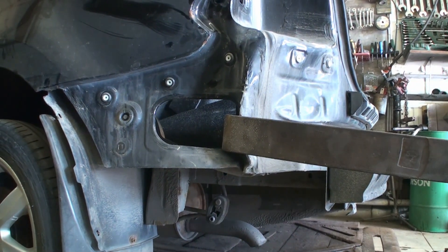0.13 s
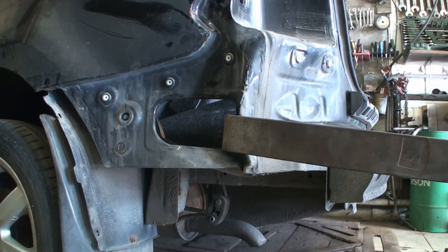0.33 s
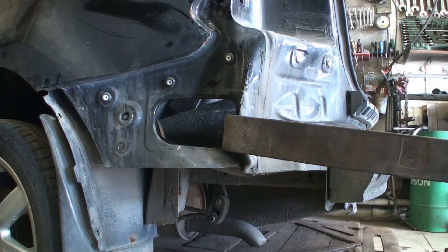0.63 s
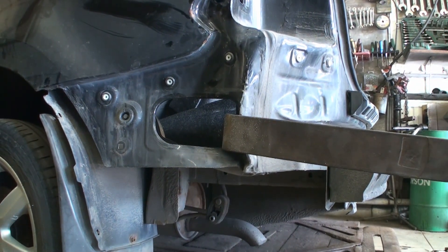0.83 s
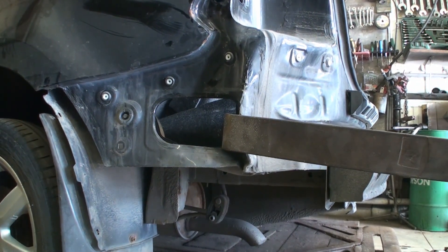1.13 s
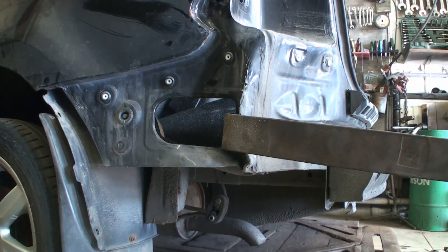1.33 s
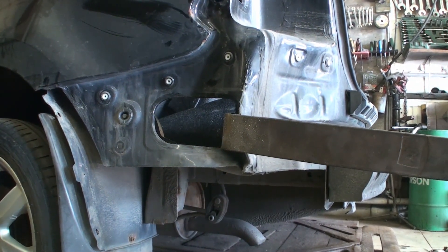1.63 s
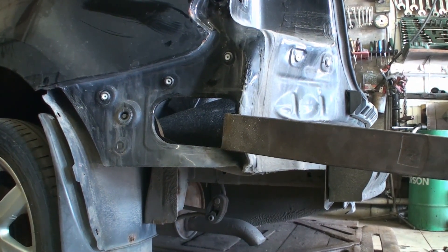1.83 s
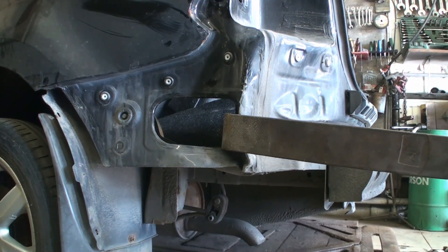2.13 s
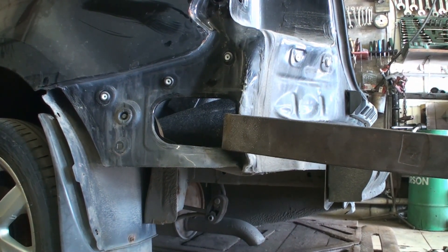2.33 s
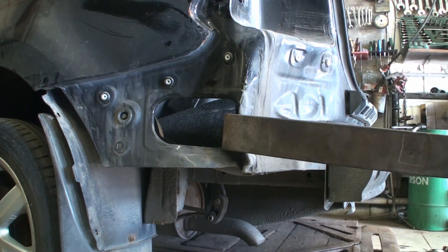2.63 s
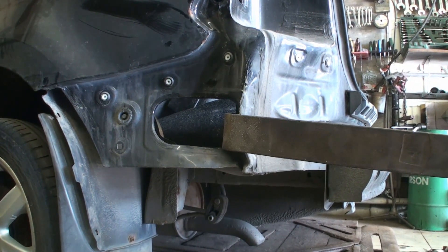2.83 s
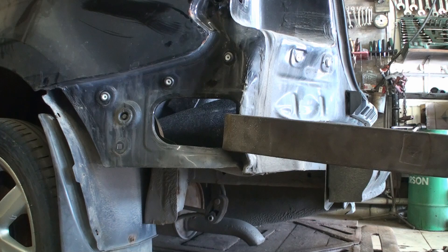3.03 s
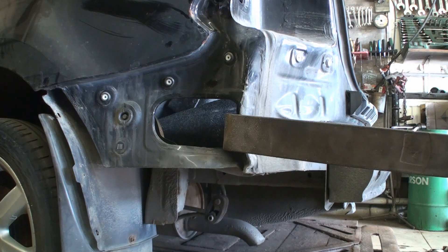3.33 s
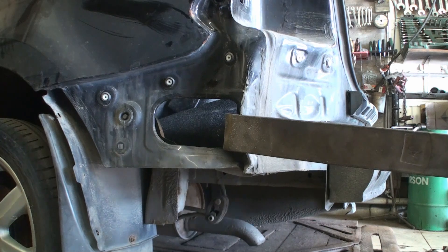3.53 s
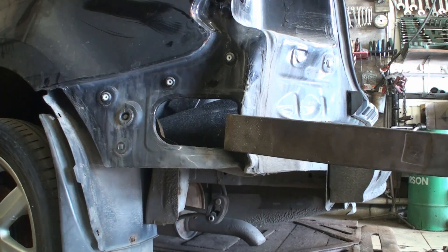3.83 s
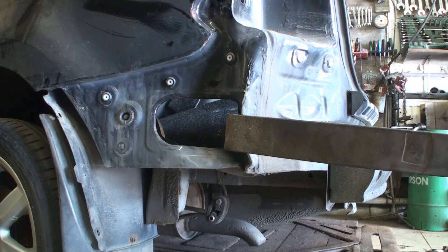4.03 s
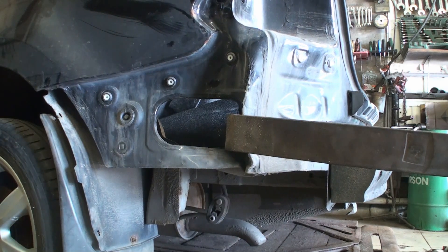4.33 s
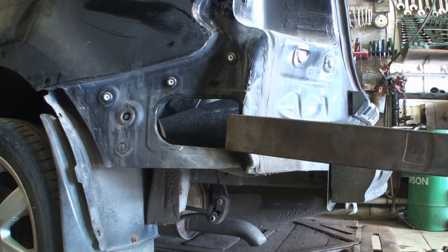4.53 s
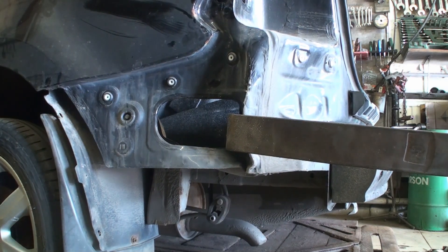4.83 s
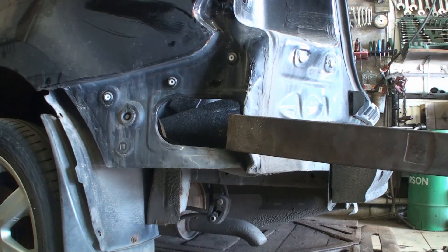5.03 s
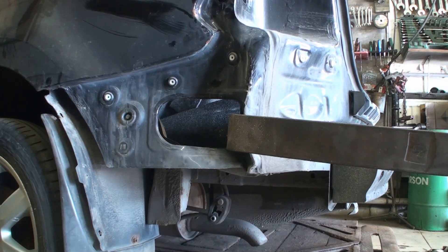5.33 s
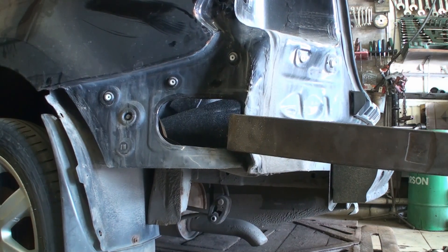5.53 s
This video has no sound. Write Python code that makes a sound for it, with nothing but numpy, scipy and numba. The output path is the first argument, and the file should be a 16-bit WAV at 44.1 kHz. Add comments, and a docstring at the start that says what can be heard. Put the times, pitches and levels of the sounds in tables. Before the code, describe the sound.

Quiet workshop hum first, throbbing deeply, with airy swishes and a dull tap. Then a short knock and whistling spit of compressed air lead straight into a loud machine-gun-like rattle from an air-driven hydraulic pump. Hard steel clacks, hollow ringing, sizzling clicks and low air puffs repeat many times a second, slowing a little. The pump is near the microphone in a reverberant garage, leaning slightly right.

```python
"""An air-driven hydraulic pump in a garage pulls on a car body.
At first a compressor throbs (harmonics of its crank), with a far hiss that swells (noise) and a knock.
The air valve opens with whistles (narrow noise bands) and a rush of air (broad noise).
Then the piston hammers, some 18 blows a second slowing to 14: echoing noise through housing resonances,
a ringing air cylinder, seal chatter and exhaust puffs. A limiter flattens blows and pushes down the rest."""
import sys
import numpy as np
from scipy import signal
from scipy.fft import rfft, irfft
from scipy.io import wavfile
from scipy.ndimage import uniform_filter1d, minimum_filter1d
from numba import njit

SR = 44100
rng = np.random.default_rng(int(sys.argv[2]) if len(sys.argv) > 2 else 0)


def digitize_waveform(pressure):
    """Quantize a signal to 16-bit integers and store it at the path in sys.argv[1].

    Rows of a 2-D input are taken as channels; values are limited to [-1, 1].
    """
    field = np.atleast_2d(pressure).T
    bounded = np.clip(field, -1, 1)
    quanta = np.round(bounded * 32767).astype(np.int16)
    wavfile.write(sys.argv[1], SR, quanta)


N = 250929
TIME = np.arange(N) / SR
STROKE_SIZE = 16384  # samples computed for each stroke
AGE = np.arange(STROKE_SIZE) / SR  # seconds since a stroke began

VALVE_S, FIRST_BLOW_S = 1.336, 1.4063
LOAD_RISE_S = 3.0725  # from the first blow to full load
# Piston speed [strokes per s]: at full load, the extra when unloaded, and the extra of the first rush
LOADED_RATE, SLACK_RATE, RUSH_RATE = 14.2203, 1.3339, 2.1673
RUSH_DECAY_S = .3474


def load_at(t):
    """Hydraulic loading: pressure builds evenly from 0 (slack) to 1 (full pull)."""
    return np.clip((t - FIRST_BLOW_S) / LOAD_RISE_S, 0, 1)


def stroke_times():
    """Reciprocating motion: one blow per full cycle, setting off in a rush and slowing under load."""
    t = TIME[TIME >= FIRST_BLOW_S]
    rush = RUSH_RATE * burst(t - FIRST_BLOW_S, RUSH_DECAY_S)
    rate = LOADED_RATE + SLACK_RATE * (1 - load_at(t)) + rush
    cycles = np.cumsum(rate) / SR
    return np.interp(np.arange(int(cycles[-1]) + 1), cycles, t)


# Clack spectrum of the steel housing: (frequency [Hz], level [dB])
CLACK_SPECTRUM = [(60, -29), (130, 0), (250, -8.5), (520, -6.5), (800, -8), (1030, -8), (1300, 0),
                  (1900, -6), (2800, -2), (4500, -1.5), (5300, -6), (6200, -5), (8800, -8.5), (9900, -15.5),
                  (13800, -18)]
# Housing resonances, as lifts of that spectrum:
# (frequency [Hz], width at half lift [Hz], lift unloaded [dB], lift loaded [dB])
HOUSING_MODES = [(350, 122, 3, 9), (528, 105, 9, 7), (686, 74, 9.5, 12.5), (816, 58, 7, 10),
                 (977, 145, 8.5, 5.5), (1153, 170, 6.5, 4), (1270, 890, 3, 2.5), (1487, 155, 9.5, 7.5),
                 (1607, 72, -9, 9), (2230, 430, 3.5, 5.5), (2870, 870, 2.5, 3), (3220, 330, 2.5, 4),
                 (3900, 220, 2, -1), (4630, 720, 1.5, 3.5), (6010, 480, 8, 4), (6700, 200, 0, 4),
                 (7610, 510, 7.5, 12), (9130, 230, 8, 5.5), (10280, 640, 7, 4.5), (11890, 1170, 6, 10)]


def housing_response(load):
    """Modal resonance: the steel housing colours the clack, its modes shifting in strength with load."""
    hz = bins(STROKE_SIZE)
    lift_db = 0
    for mode_hz, width_hz, slack_db, taut_db in HOUSING_MODES:
        lift_db = lift_db + blend(slack_db, taut_db, load) * bell(hz, mode_hz, width_hz) ** 2
    return causal(colour(CLACK_SPECTRUM, hz) * undb(lift_db))


def even_grain(pair):
    """Reverberant interference: a dense echo spectrum, even in the bass, more uneven in the treble."""
    spectrum = rfft(pair)
    power = np.abs(spectrum) ** 2
    near = uniform_filter1d(power, size=41, axis=-1)
    wide = uniform_filter1d(power, size=301, axis=-1)
    treble = np.clip(bins(STROKE_SIZE) / 3000, 0, 1)
    return spectrum / np.sqrt(blend(near, wide, treble) + 1e-9)


SLACK_RING_HZ, LOADED_RING_HZ = 1490, 1580
SLACK_RING_DECAY_S, LOADED_RING_DECAY_S = .001, .0018
# The ring sags through each stroke as the air expands, most when the pump is slack
SLACK_SAG_HZ_PER_S, LOADED_SAG_HZ_PER_S = 4000, 2200
# Play in the piston: spread of ring pitch per stroke, and of each contact's force and ring phase
PLAY_HZ, PLAY_DB, PLAY_CYCLES = 3, 1.3, .035


def cylinder_ring(since, load, slip):
    """Cavity resonance: every contact rings the air cylinder, nearly in step with the others."""
    early = np.sqrt(load)  # rises fast as the load begins
    envelope = bloom(since, blend(SLACK_RING_DECAY_S, LOADED_RING_DECAY_S, early))
    ring_hz = blend(SLACK_RING_HZ, LOADED_RING_HZ, early) + PLAY_HZ * rng.standard_normal()
    sag = blend(SLACK_SAG_HZ_PER_S, LOADED_SAG_HZ_PER_S, early)
    cycles = (ring_hz - sag * AGE / 2) * AGE + PLAY_CYCLES * slip[:, None]
    return envelope * np.cos(2 * np.pi * cycles)


# The blow, its rebounds and the return to the stop:
# (delay [s], clack [dB], ring unloaded [dB], ring loaded [dB], clack decay [s])
CONTACT_TABLE = [(.0003, 6.5, -2, -6, .002), (.0075, -16, -3, 0, .002), (.0128, -12, 6.5, 0, .002),
                 (.0185, -1, -14, -12, .0025), (.024, 1.5, 5.5, 3, .0025), (.0278, -2, -3, 1, .0025),
                 (.0355, -5, -3, -9, .0015), (.040, -9, -6, -11, .0015), (.0455, -8, -6, -9, .0015)]
# Thud of the pump's body under the main blow
THUD_HZ, THUD_DB, THUD_DECAY_S = 740, 1, .0008
# Near surfaces throw the main blow back
NEAR_ECHO_DB, NEAR_ECHO_DECAY_S = -1, .012


def hammer(times, blow_db=9, ring_db=-4, room_db=-5, room_decay_s=0.14, scatter_db=3.0):
    """Impact excitation: each stroke strikes housing, cylinder and room, its echoes drifting slowly."""
    out = np.zeros((2, N))
    delay, clack_db, slack_db, taut_db, decay = np.transpose(CONTACT_TABLE)
    since = AGE - delay[:, None]
    clacks = burst(since, decay[:, None])
    room = undb(room_db) * burst(AGE, room_decay_s)
    room = room + undb(NEAR_ECHO_DB) * burst(AGE, NEAR_ECHO_DECAY_S)
    thud = undb(THUD_DB) * bloom(AGE, THUD_DECAY_S) * np.sin(2 * np.pi * THUD_HZ * AGE)
    lasting, creeping = rng.standard_normal((2, 2, STROKE_SIZE))
    renewal, creep = .15, .7  # share of the drifting echoes renewed per stroke; their amplitude
    for s in times:
        load = load_at(s)
        force, slip = rng.standard_normal((2, len(CONTACT_TABLE)))
        clack_env = room + undb(clack_db + PLAY_DB * force) @ clacks
        fresh = rng.standard_normal(creeping.shape)
        creeping = np.sqrt(1 - renewal) * creeping + np.sqrt(renewal) * fresh
        echoes = even_grain((lasting + creep * creeping) * clack_env)
        # levelling the spectrum removed the envelope's energy: restore it
        stroke = irfft(echoes * housing_response(load)) * np.linalg.norm(clack_env)
        ring_size = undb(ring_db + blend(slack_db, taut_db, load))
        stroke[0] += thud + ring_size @ cylinder_ring(since, load, slip)
        add(out, stroke * undb(blow_db + scatter_db * rng.standard_normal()), s)
    return out


# Colour of the seal's chatter: (frequency [Hz], level [dB])
CHATTER_SPECTRUM = [(1500, -32), (3300, -29), (5500, -20), (7800, 16), (9200, -11), (10200, 5), (12000, 6),
                    (13500, -19)]


def chatter(times, level_db=-5, scatter_db=3.5):
    """Stick-slip friction: the seal sprays random bright clicks as the piston slides back."""
    peak_s, width_s = .021, .0055  # after the blow
    slide, click_rate = np.zeros(N), 12000  # clicks per second
    for s in times:
        size = undb(scatter_db * rng.standard_normal())
        add(slide, size * swell(AGE - peak_s, width_s, width_s), s)
    struck = rng.random((2, N)) < click_rate / SR
    clicks = struck * rng.standard_normal((2, N)) * np.sqrt(SR / click_rate)
    return undb(level_db) * shape(clicks * slide, colour(CHATTER_SPECTRUM, bins(N)))


# Colour of the exhaust air: (frequency [Hz], level [dB])
EXHAUST_SPECTRUM = [(100, 15), (350, 7), (1400, 5), (3000, 5.5), (6000, -35), (7700, -8), (10000, -20),
                    (13500, -23)]
PUFF_LOAD_DB = 2  # full load strengthens the puffs
PUFF_HZ, PUFF_SCATTER_DB, PUFF_SCATTER_OCTAVES = 116, 1.0, 0.1  # base pitch, and spread between puffs
PUFF_SAG_HZ_PER_S, PUFF_CYCLES = 7000, .7  # fall in pitch; base half-width of the puff's envelope
# Around this time the puffs are louder, higher and shorter: the changes at its peak
SURGE_S, SURGE_WIDTH_S = 2.44, 0.44
SURGE_DB, SURGE_HZ, SURGE_CYCLES = 7.5, 48, -.36


def exhaust(times, vent_db=-14, puff_db=-7, boom_db=5, boom_hz=108, boom_width_hz=16, lead_s=0.00812):
    """Monopole radiation: spent air puffs and hisses before each blow, booming in the room, over a leak."""
    leak_db, vent_s, opening_s = -16, .012, .03
    puffs = np.zeros(N)
    flow = undb(leak_db) * (TIME > VALVE_S) * (1 - burst(TIME - VALVE_S, opening_s))
    for s in times:
        surge = swell(s - SURGE_S, SURGE_WIDTH_S, SURGE_WIDTH_S)
        octaves = PUFF_SCATTER_OCTAVES * rng.standard_normal()
        puff_hz = (PUFF_HZ + SURGE_HZ * surge) * 2 ** octaves
        half_cycles = PUFF_CYCLES + SURGE_CYCLES * surge
        t = AGE - 2 / puff_hz  # zero at the middle of the puff
        tone = np.sin(2 * np.pi * (puff_hz - PUFF_SAG_HZ_PER_S * t / 2) * t)
        puff = tone * np.exp(-(t * puff_hz / half_cycles) ** 2)
        scatter = PUFF_SCATTER_DB * rng.standard_normal()
        size = undb(puff_db + PUFF_LOAD_DB * load_at(s) + SURGE_DB * surge + scatter)
        add(puffs, size * puff, s - lead_s - 2 / puff_hz)
        add(flow, undb(vent_db) * burst(AGE, vent_s), s - lead_s)
    room = causal(bell(bins(2 * N), boom_hz, boom_width_hz))
    boom = irfft(rfft(puffs, 2 * N) * room)[:N]
    air = flow * shape(rng.standard_normal((2, N)), colour(EXHAUST_SPECTRUM, bins(N)))
    return air + np.array([puffs + undb(boom_db) * boom, np.zeros(N)])


# Short whistles as the valve opens and the air finds its way:
# (time [s], frequency [Hz], width at half amplitude [Hz], level [dB], decay [s])
VALVE_WHISTLES = [(1.335, 5870, 490, -7, 0.018), (1.337, 2700, 450, -14, 0.018),
                  (1.343, 7000, 500, -16, .02), (1.337, 4800, 900, -10.5, .014),
                  (1.366, 1000, 700, -14, .014), (1.374, 1270, 450, -5, 0.0073),
                  (1.377, 4670, 1300, -7, 0.016), (1.383, 2550, 900, -6, 0.015),
                  (1.386, 1400, 600, -18, 0.011), (1.397, 2770, 520, -1, .008)]


def valve(whistle_db=-7, rise_s=0.0028):
    """Jet noise: air spits and whistles through the valve seat as it cracks open."""
    spit_db, spit_s = -21, .04
    hz = bins(N)

    def spurt(start_s, decay_s):
        """Quick onset and exponential decay of a transient jet."""
        return burst(TIME - start_s, decay_s) * (1 - burst(TIME - start_s, rise_s))

    whistles = np.zeros((2, N))
    for s, f, width_hz, db, decay_s in VALVE_WHISTLES:
        band = shape(rng.standard_normal((2, N)), bell(hz, f, width_hz) ** 2)
        whistles += undb(db) * spurt(s, decay_s) * band
    air = shape(rng.standard_normal((2, N)), np.sqrt(colour(EXHAUST_SPECTRUM, hz)))
    return undb(whistle_db) * whistles + undb(spit_db) * spurt(VALVE_S, spit_s) * air


# Colour of the air rushing in as the pump sets off: (frequency [Hz], level [dB])
INRUSH_SPECTRUM = [(300, -18), (900, -6), (1200, 3), (1800, -1), (2700, -8), (4500, 3), (6000, 1),
                   (8000, -6), (13500, -9)]


def inrush(air_db=-12.5, settle_s=0.69, rise_s=0.087):
    """Turbulent flow: air rushes freely into the slack pump, then dies away exponentially."""
    age = TIME - VALVE_S
    flow = undb(air_db) * burst(age, settle_s) * (1 - burst(age, rise_s))
    return flow * shape(rng.standard_normal((2, N)), colour(INRUSH_SPECTRUM, bins(N)))


# Knocks of the rig, the pedal and the piston as it sets off:
# (time [s], level [dB], centre frequency [Hz], decay [s])
KNOCK_TABLE = [(0.539, -9.5, 710, 0.0014), (1.303, -18, 620, 0.0077), (1.361, -11.5, 875, 0.0076),
               (1.365, -20, 2080, 0.0073), (1.383, -32, 1690, 0.009)]


def knocks(room_db=-21, room_decay_s=0.05, tap_db=16):
    """Impulse response: a tap and brief rattle excite a dull resonance, with a short room tail."""
    out = np.zeros((2, N))
    for s, db, f, decay_s in KNOCK_TABLE:
        envelope = burst(AGE, decay_s) / 2 + undb(room_db) * burst(AGE, room_decay_s)
        strike = rng.standard_normal((2, STROKE_SIZE)) * envelope
        strike[0, 0] += undb(tap_db)
        body = bell(bins(STROKE_SIZE), f, 0.88 * f) ** 4
        knock = irfft(rfft(strike) * causal(body)) / np.sqrt(np.mean(body ** 2))
        add(out, undb(db) * knock, s)
    return out


# Swells of the far hiss: (time of peak [s], level [dB], rise [s], fall [s])
SWISH_STROKES = [(.03, -39.5, 0.037, 0.16), (.257, -30.5, 0.046, 0.068), (.582, -34.5, 0.031, 0.039),
                 (.67, -38, 0.077, 0.14), (.965, -34, 0.076, 0.088), (1.26, -39, 0.087, 0.17)]
HISS_DB = -44.5  # steady hiss, on the same relative scale as the swells


def swishing():
    """Energy summation: the powers of the swells add to that of a steady hiss."""
    power = undb(HISS_DB) ** 2
    for s, db, rise_s, fall_s in SWISH_STROKES:
        power = power + (undb(db) * swell(TIME - s, rise_s, fall_s)) ** 2
    return np.sqrt(power)


CRANK_HZ = 20.46  # mean turns of the compressor's crank per second
# Compressor harmonics: (multiple of the crank rate, level [dB])
COMPRESSOR_HARMONICS = [(1, -4), (2, 2.5), (4, -10), (5, 2), (6, -11), (8, -15), (9, -11), (10, -13),
                        (11, -17), (12, -11.5), (13, -16), (14, -17), (15, -18), (16, -14), (18, -13),
                        (19, -19), (20, -21), (24, -20.5), (29, -25), (35, -17), (64, -22.5)]
# Workshop rumble: (frequency [Hz], level [dB])
RUMBLE_SPECTRUM = [(12, -35), (25, -14), (60, 0), (110, -3.5), (160, -5.5), (350, -9), (440, -15.5),
                   (720, -16.5), (1900, -31), (6400, -32.5), (10800, -41), (15000, -42)]
# Colour of the far swishing: (frequency [Hz], level [dB])
SWISH_SPECTRUM = [(800, -11), (2200, -9), (4000, -9.5), (6300, -6), (8500, -12), (10300, -20),
                  (11800, -16.5), (15000, -31)]


def workshop(hum_db=-29.5, rumble_db=-29.0, throb=0.061, swish_db=-1):
    """Periodic and random noise: crank harmonics hum, rumble throbs at the crank rate, a far hiss swells."""
    steps = np.repeat(rng.standard_normal(N // 4410 + 1), 4410)  # a new speed every 0.1 s
    wander = uniform_filter1d(steps, size=4410)[:N]
    crank = 2 * np.pi * np.cumsum(CRANK_HZ * (1 + 0.0041 * wander)) / SR
    hum = np.zeros(N)
    for multiple, db in COMPRESSOR_HARMONICS:
        hum += undb(hum_db + db) * np.sin(multiple * crank + 2 * np.pi * rng.random())
    hz = bins(N)
    rumble = shape(rng.standard_normal((2, N)), colour(RUMBLE_SPECTRUM, hz))
    rumble = undb(rumble_db) * (1 + throb * np.sin(crank)) * rumble
    hiss = shape(rng.standard_normal((2, N)), colour(SWISH_SPECTRUM, hz))
    swish = undb(swish_db) * swishing() * hiss
    return rumble + swish + np.array([hum, np.zeros(N)])


def undb(db):
    """Logarithmic level: decibels to amplitude gain."""
    return 10 ** (np.asarray(db) / 20)


def blend(start, end, share):
    """Linear interpolation from start (share 0) to end (share 1)."""
    return start + share * (end - start)


def colour(points, hz):
    """Spectral envelope: gain of (Hz, dB) points joined on a log-frequency axis."""
    f, db = np.transpose(points)
    return undb(np.interp(np.log(hz + 1), np.log(f), db))


def bins(size):
    """Fourier analysis: frequencies of a real transform."""
    return np.arange(size // 2 + 1) * SR / size


def shape(x, gain):
    """Linear filtering by a gain per frequency, keeping the power of white noise."""
    return irfft(rfft(x) * gain / np.sqrt(np.mean(gain ** 2)), x.shape[-1])


def causal(gain):
    """Minimum phase: the response with this gain that rings only after it is struck."""
    cepstrum = irfft(np.log(gain + 1e-5))
    half = len(cepstrum) // 2
    cepstrum[1:half] *= 2
    cepstrum[half + 1:] = 0
    return np.exp(rfft(cepstrum))


def bell(hz, centre_hz, width_hz):
    """Resonance curve: gain of one mode, 3 dB down at the edges of its width."""
    return 1 / np.sqrt(1 + (2 * (hz - centre_hz) / width_hz) ** 2)


def burst(t, decay_s):
    """Free decay: sudden start at t = 0, exponential fall."""
    return (t >= 0) * np.exp(-np.maximum(t, 0) / decay_s)


def bloom(t, decay_s):
    """Critically damped response: swells from t = 0 to 1 in one decay time, then dies away."""
    return np.e * t / decay_s * burst(t, decay_s)


def swell(t, rise_s, fall_s):
    """Gaussian envelope: a smooth rise to 1 at t = 0 and a smooth fall."""
    return np.exp(-(t / np.where(t < 0, rise_s, fall_s)) ** 2)


def add(out, x, start_s):
    """Superposition: mix a sound in at a time."""
    i = max(int(start_s * SR), 0)
    part = x[..., :max(N - i, 0)]
    out[..., i:i + part.shape[-1]] += part


# Stereo width: (frequency [Hz], gain of side over mid [dB])
SIDE_GAIN = [(50, -39), (110, -14), (300, -9), (700, -7.5), (1150, -6.5), (1520, -2), (2400, -6.5),
             (3300, -9.5), (5500, -12), (7600, -13.5), (9000, -3.5), (11000, -3), (13000, -10)]
# Stereo lean: (frequency [Hz], left minus right [dB])
LEFT_LEAN = [(60, 2.5), (150, -1), (350, -0.5), (700, -3.5), (1400, -3.5), (2500, -3), (4500, -2),
             (8000, 0.5), (14000, -2)]


def stereo(pair):
    """Mid-side decoding to left and right: the deep bass is nearly mono, the middle leans right."""
    hz = bins(N)
    mid, side = rfft(pair)
    side = side * colour(SIDE_GAIN, hz)
    lean = np.sqrt(colour(LEFT_LEAN, hz))
    return irfft(np.array([(mid + side) * lean, (mid - side) / lean]), N)


def scene():
    """Superposition of pump, valve and workshop in one stereo field."""
    times = stroke_times()
    pump = hammer(times) + chatter(times) + exhaust(times)
    return stereo(pump + valve() + inrush() + knocks() + workshop())


@njit
def follow(x, attack, release):
    """Envelope detection: one-pole smoothing with separate rise and fall rates."""
    out, e = np.empty(len(x)), 0.
    for i in range(len(x)):
        e += (x[i] - e) * (attack if x[i] > e else release)
        out[i] = e
    return out


def limiter(x, ceiling_db=-15.5, settle_db=-2.5, settle_s=0.57):
    """Look-ahead compression: ducks just before each blow; long loud spells ease the gain down further."""
    ratio, release_s = 6.5, .012
    rms = np.sqrt(np.abs(uniform_filter1d(np.mean(x ** 2, axis=0), size=36)))
    coming = -minimum_filter1d(-rms, size=111, origin=-55)  # loudest in the next 2.5 ms
    level = follow(coming, 1 / 8, 1 / (release_s * SR))
    settle_rate = 1 / (settle_s * SR)
    spell = follow(1. * (level > undb(ceiling_db)), settle_rate, settle_rate)
    gain = np.minimum(1, undb(ceiling_db) / (level + 1e-9)) ** (1 - 1 / ratio)
    return x * gain * undb(settle_db * spell)


TOP_HZ = 13900  # upper edge of the recorder's band


def record(dry):
    """Band limiting and saturation: drops the deepest bass, limits, rounds the peaks, cuts the top."""
    trimmed = signal.sosfilt(signal.butter(3, 28, "high", fs=SR, output="sos"), dry)
    rounded = .8 * np.tanh(limiter(trimmed) / .8)
    return signal.sosfilt(signal.ellip(8, .2, 70, TOP_HZ, fs=SR, output="sos"), rounded)


dry = scene()
out = record(dry)
digitize_waveform(out)
```